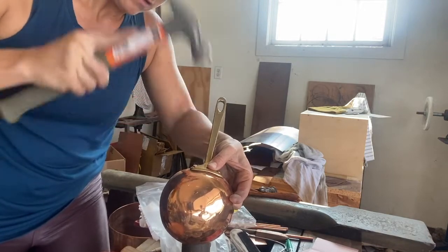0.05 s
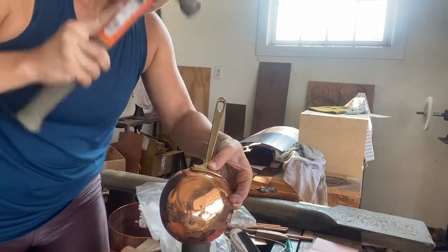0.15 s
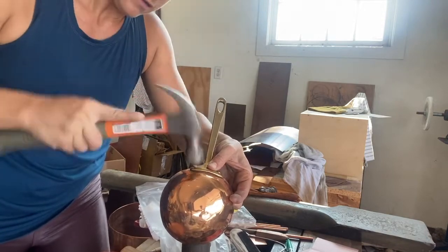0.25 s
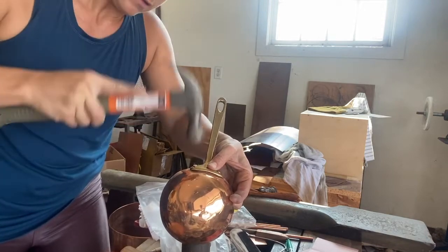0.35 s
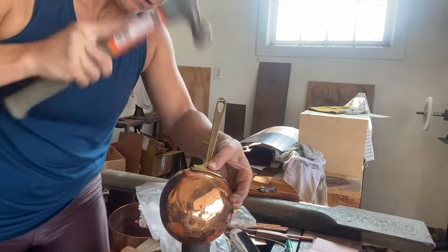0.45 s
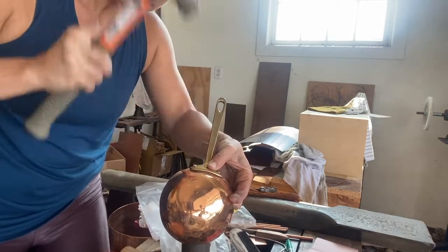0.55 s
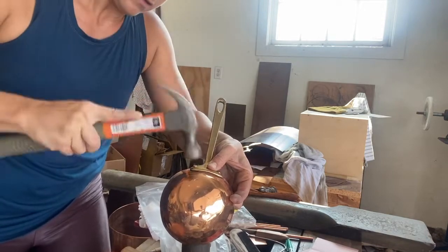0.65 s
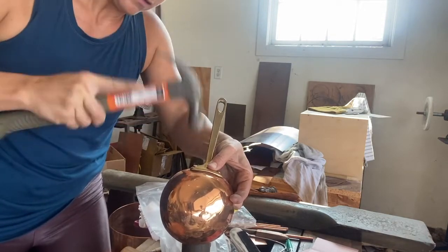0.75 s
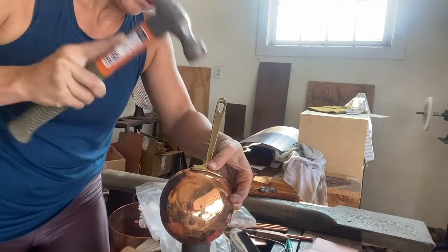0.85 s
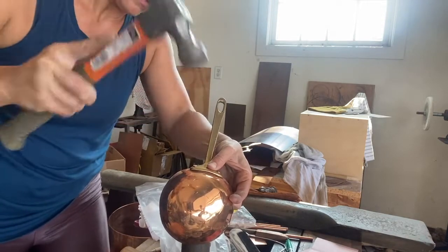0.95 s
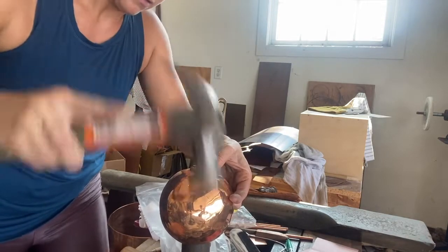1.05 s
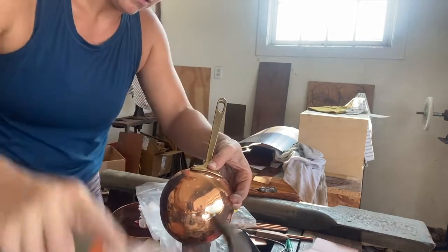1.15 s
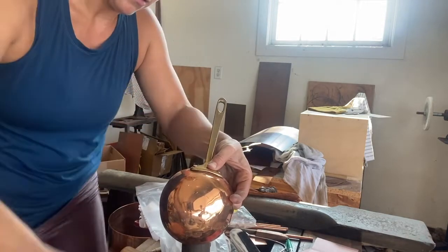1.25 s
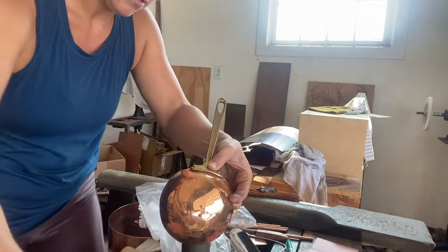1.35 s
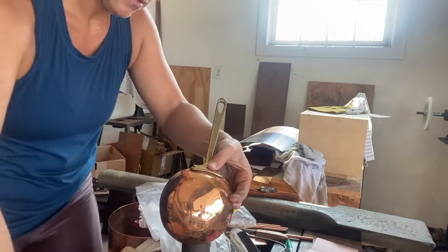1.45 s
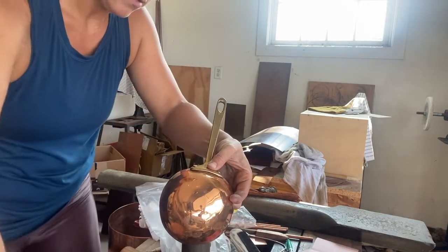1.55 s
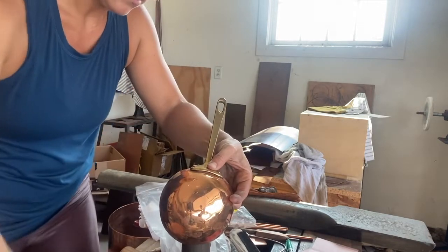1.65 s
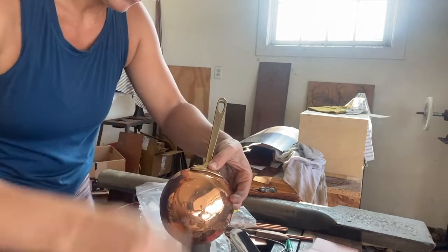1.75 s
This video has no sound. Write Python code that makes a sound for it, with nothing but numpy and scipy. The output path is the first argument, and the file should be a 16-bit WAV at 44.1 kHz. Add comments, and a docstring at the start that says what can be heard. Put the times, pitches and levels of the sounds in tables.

```python
"""In a workshop, a hammer drives a rivet in a copper bowl against a steel stake, close to the listener.
Each of two blows is chattering noise, damped steel tones and a low bench thump.
The loose bowl shakes, drops back and rattles: thousands of tiny random contacts, plus clear taps.
A decaying noise tail is the room's answer; shaped noise makes a steady low hum and faint rustles.
A faint bump, a slow bench sway and a thin late ring are single damped tones."""
import sys
import numpy as np
from scipy import signal
from scipy.fft import rfft, irfft, next_fast_len
from scipy.io import wavfile

SR = 44100
rng = np.random.default_rng(int(sys.argv[2]) if len(sys.argv) > 2 else 0)


def file_out(sig):
    """Save sig as 16-bit WAV at sys.argv[1]."""
    # one column per channel
    cols = np.atleast_2d(sig).T
    # limit, then scale
    lim = np.clip(cols, -1, 1)
    pcm = np.round(lim * 32767).astype(np.int16)
    wavfile.write(sys.argv[1], SR, pcm)


N = 79380
PRE = SR // 4  # lead-in samples, dropped at the end

# Moments of the hammer blows: [t/s]
BLOW_TIMES = [.2251, .61]
# One row per blow: [crack level/dB before a 3.5 dB cut, clack f/Hz, clack level/dB, squeal swell/s,
# steel level/dB, thud level/dB, boom level/dB, boom f/Hz, boom lag/s, knock level/dB, chatter length/s]
BLOWS = [(-11, 3400, -20.5, .001, -22.5, -25.5, -8, 80, .0095, -22.5, 0.0098),
         (-9, 3900, -16.5, .004, -16.5, -20, -14.5, 55, 0.015, -8, 0.0061)]


def blow(s, crack_db, clack_hz, clack_db, squeal_swell, steel_db, thud_db,
         boom_db, boom_hz, boom_lag, knock_db, chatter_s):
    """One impact sets off the contact noise, the steel and the bench together."""
    contact = crack(s, crack_db, squeal_swell, chatter_s) + clack(s, clack_hz, clack_db)
    bench = thud(s, thud_db, chatter_s) + boom(s, boom_db, boom_hz, boom_lag) + knock(s, knock_db)
    return contact + steel(s, steel_db) + bench


# Tone of the chattering contact: [f/Hz, relative level/dB per Hz]
CRACK_TONE = [(240, -22.5), (400, -10.5), (1000, -9.5), (2090, -17.5), (2800, -16), (3500, -12.5),
              (5110, -18.5), (7000, -15), (8200, -6), (9470, -7), (10500, -6), (11900, -13), (14600, -18.5),
              (16000, -23)]
CRACK_T60_S, AFTER_DB, AFTER_T60_S = 0.0051, -13, 0.21
REBOUND_S, REBOUND_DB = 0.0024, -11  # delay after the chatter, level of the second touch
SQUEAL_HZ, SQUEAL_WIDTH_HZ, SQUEAL_DB = 8180, 170, -6  # level against the noise


def crack(s, level_db, squeal_swell, chatter_s):
    """The hammer face chatters and sings, touches once more, and leaves a longer, weaker noise."""
    noise = coloured(rng.standard_normal(PRE + N), CRACK_TONE)
    squeal = amp(SQUEAL_DB) * band(SQUEAL_HZ, SQUEAL_WIDTH_HZ)
    squeal = squeal * np.minimum(since(s) / squeal_swell, 1)
    chatter = burst(s, .0004, chatter_s, CRACK_T60_S)
    rebound = amp(REBOUND_DB) * burst(s + chatter_s + REBOUND_S, 0.00038, 0.0024, CRACK_T60_S)
    after = amp(AFTER_DB) * noise * burst(s, 0.0014, chatter_s, AFTER_T60_S)
    return amp(level_db - 3.5) * ((noise + squeal) * (chatter + rebound) + after)


CLACK_WIDTH_HZ, CLACK_T60_S, CLACK_TONE_DB = 300, 0.022, 1.5  # tone level against the noise column


def clack(s, hz, level_db):
    """The first touch: a short noise band and a damped tone at the same pitch."""
    noise = amp(level_db) * band(hz, CLACK_WIDTH_HZ) * burst(s, .0008, 0.001, CLACK_T60_S)
    return noise + ring(hz, s, .0005, CLACK_T60_S, level_db + CLACK_TONE_DB)


# Ringing of the stake and hammer head: [f/Hz, relative level/dB, t60/s]
STEEL = [(660, -11, .05), (990, -10, 0.12), (1262, -12, 0.14), (1540, -9, .09), (2495, -13, .07),
         (3530, -12, .09), (6616, -15, 0.12), (7565, -16, .13), (7975, -6, .06), (8230, -6, 0.09),
         (8880, -10, .11), (12200, -14, 0.06)]


def steel(s, level_db):
    """Struck steel rings in many damped tones, a little different in pitch and level each time."""
    total = 0
    for hz, level, t60 in STEEL:
        varied_hz = hz * (1 + .002 * rng.normal())
        total = total + ring(varied_hz, s, .0006, t60, level_db + level + rng.normal(0, 2))
    return total


# Tone of the dull thud: [f/Hz, relative level/dB per Hz]
THUD_TONE = [(35, -41), (55, -6.5), (100, -4), (180, 1.5), (300, -1), (550, -2), (1500, -11.5),
             (3000, -38.5)]
THUD_LAG_S, THUD_RISE_S, THUD_T60_S = 0.00067, 0.0034, 0.1


def thud(s, level_db, chatter_s):
    """Mostly low noise that rises just after the touch and dies away."""
    noise = coloured(rng.standard_normal(PRE + N), THUD_TONE)
    return amp(level_db) * noise * burst(s + THUD_LAG_S, THUD_RISE_S, chatter_s, THUD_T60_S)


# How the bench boom grows and fades: [swell/s, t60/s]
BOOM_SHAPE = (0.0019, 0.059)
BOOM_SAG, BOOM_SAG_S = 0.54, 0.0022  # starts this share higher, sinks with this time constant


def boom(s, level_db, hz, lag):
    """The bench answers late with a deep tone that sinks in pitch."""
    return ring(hz, s + lag, *BOOM_SHAPE, level_db, BOOM_SAG, BOOM_SAG_S)


# Tones of the bench top: [f/Hz, relative level/dB, t60/s]
KNOCK = [(179, -8.5, 0.025), (241.8, 0, 0.034), (315, -2.5, 0.035), (554, -7, 0.021)]
KNOCK_LAG_S, KNOCK_SWELL_S = .0045, .0012


def knock(s, level_db):
    """The bench top sounds in several short damped tones."""
    return sum(ring(hz, s + KNOCK_LAG_S, KNOCK_SWELL_S, t60, level_db + level)
               for hz, level, t60 in KNOCK)


# The loose bowl shakes after every blow and drops back a moment later: [t/s, level/dB]
RATTLE_LEVEL = [(-.1, -55), (0, -37), (0.039, -39), (0.131, -45.5), (0.208, -54.5), (.24, -39.5),
                (0.349, -43), (0.418, -37), (0.499, -45), (0.591, -55.5), (.63, -36.5), (0.719, -41.5),
                (.8, -38.5), (0.872, -44.5), (.97, -60), (1.08, -72.5), (1.3, -96)]
# Tone of the bowl on the stake: [f/Hz, relative level/dB per Hz]
RATTLE_TONE = [(60, -30.5), (100, -15.5), (220, -9), (500, -11.5), (1200, -8), (1500, -8.5), (1800, -7),
               (2400, -9.5), (3400, -11), (4870, -17), (7940, -14.5), (10500, -17.5), (13200, -22),
               (15500, -24.5), (16200, -41.5)]
CONTACTS_PER_S, CONTACT_SCATTER_DB = 6300, 1
DULL_HZ, DULLING = 4000, 0.39  # treble above this loses so many extra dB per dB of level


def rattle():
    """Dense uneven contacts of the bowl on the stake; weaker shaking sounds duller."""
    scatter, strength = rng.standard_normal((2, PRE + N))
    touches = rng.random(PRE + N) < CONTACTS_PER_S / SR
    hits = touches * amp(CONTACT_SCATTER_DB * scatter) * strength
    s, db = np.transpose(RATTLE_LEVEL)
    level_db = np.interp((np.arange(PRE + N) - PRE) / SR, s, db)
    whole = coloured(hits, RATTLE_TONE)
    body = filtered(whole, lambda hz: 1 / (1 + (hz / DULL_HZ) ** 2))
    treble = (whole - body) * amp(DULLING * (level_db - db.max()))
    return amp(level_db) * (body + treble)


# Clear taps of the bowl: [t/s, level/dB before a 7 dB lift, f/Hz]
TAPS = [(0.021, -36, 1430), (0.033, -29, 1536), (0.0614, -42, 1580), (0.088, -34.5, 1466),
        (0.1247, -33.5, 1556), (0.16, -36.5, 1445), (0.3776, -34, 1006), (0.3825, -29, 1475),
        (0.409, -33.5, 1520), (0.417, -30.5, 1525), (0.428, -37.5, 1487), (0.433, -33, 1475),
        (0.445, -34.5, 1415), (0.4695, -33.5, 1535), (0.482, -37.5, 1394), (0.497, -36.5, 1551),
        (0.508, -37.5, 1490), (0.547, -43.5, 1471), (0.675, -35, 1044), (0.703, -32.5, 1419),
        (0.762, -30.5, 1460), (0.78, -36.5, 1502), (0.7994, -34, 1650), (0.818, -34, 1718),
        (0.8496, -38, 1462), (0.8728, -38.5, 1520)]


def taps():
    """Each clear tap is one short damped tone of the bowl."""
    return sum(ring(hz, s, 0.0023, 0.025, db + 7) for s, db, hz in TAPS)


# The bench sways after the last blow: [f/Hz, t/s, swell/s, t60/s, level/dB]
SWAY = (49, .68, .06, .7, -42)


def sway():
    """A deep damped tone of the bench, slow to grow."""
    return ring(*SWAY)


# A thin late ring: [f/Hz, t/s, swell/s, t60/s, level/dB]
WHINE = (4055, .62, .2, 1.7, -72)


def whine():
    """A high damped tone that swells slowly and lingers."""
    return ring(*WHINE)


# A faint low bump: [f/Hz, t/s, swell/s, t60/s, level/dB]
BUMP = (350, 1.607, .003, .035, -59)


def bump():
    """A single short damped tone."""
    return ring(*BUMP)


# Faint rustles: [t/s, level/dB, length/s]
RUSTLES = [(1.429, -79.5, 0.0069), (1.445, -82, 0.0077), (1.486, -85, 0.018), (1.553, -85, .003),
           (1.642, -94, 0.0032)]


def rustles():
    """Small bursts of noise with the same tone as the rattle."""
    noise = coloured(rng.standard_normal(PRE + N), RATTLE_TONE)
    return noise * sum(amp(db) * burst(s, .002, hold, 0.08) for s, db, hold in RUSTLES)


# Tone of the room hum: [f/Hz, relative level/dB per Hz]
HUM_TONE = [(15, -50.5), (25, -18.5), (40, -2), (60, -0.5), (110, -7.5), (150, -18.5), (190, -14.5),
            (326, -30.5), (543, -34), (900, -36.5), (1600, -51.5), (4150, -48.5), (7480, -56),
            (8320, -40.5), (10000, -61), (15000, -71)]
HUM_DB = -65.5  # before sharing out to left and right


def hum():
    """Low steady room tone, made of shaped noise."""
    return amp(HUM_DB) * paired(coloured(rng.standard_normal((2, N)), HUM_TONE))


# How long the room's answer lasts: [f/Hz, t60/s]
ROOM = [(100, 0.081), (400, 0.65), (1500, 0.3), (5000, 0.5), (12000, 0.33)]
SIDE_SMEAR_S = 0.0025  # t60
BLOW_WET_DB, RATTLE_WET_DB, SMALL_WET_DB = -19.5, -8, -4  # room tail against the direct sound


def placed(x, wet_db):
    """Direct sound, scattered a little on its way to the side pickup, and a room tail."""
    hz, t, z = signal.stft(rng.standard_normal((2, SR * 3 // 4)), SR, nperseg=256)
    fade = amp(-60 * t / along(ROOM, hz)[:, None])
    tail = signal.istft(z * fade, SR, nperseg=256)[1]
    tail = amp(wet_db) * tail / np.linalg.norm(tail[0])
    answer = np.pad(tail, ((0, 0), (300, 0)))  # the tail starts 300 samples late
    smear = rng.standard_normal(200) * amp(-60 * np.arange(200) / SR / SIDE_SMEAR_S)
    answer[0, 0] = 1
    answer[1, :200] = (np.arange(200) == 0) * 0.93 + 0.26 * smear / np.linalg.norm(smear)
    return paired(signal.fftconvolve(x[None], answer, axes=1)[:, :PRE + N])


# Width of the microphone pair: [f/Hz, side over mid level/dB]
WIDTH = [(45, -5.5), (100, -10.5), (300, -5), (800, -5.5), (1500, -3.5), (2300, -3), (4000, -0.5),
         (5500, 0.5), (6900, -4.5), (7300, -25), (8400, -20), (8900, -4), (9700, 6.5), (10100, 31),
         (11200, 23), (11700, 1.5), (12300, -23.5), (13700, -27), (14200, 2), (14800, 23), (16000, 23)]
LEAN_DB = -0.86  # left over right


def paired(pair):
    """Left and right from two versions of a sound, shared out to mid and side by frequency."""
    def shares(hz):
        angle = np.arctan(amp(along(WIDTH, hz)))
        return np.array([np.cos(angle), 1j * np.sin(angle)])  # 1j: quarter-turn of phase
    mid, side = filtered(pair, shares)
    return np.array([mid + side, mid - side]) * amp([[LEAN_DB / 2], [-LEAN_DB / 2]])


def ring(hz, s, swell, t60, db, sag=0, sag_s=1):
    """One damped tone with a soft start; its pitch may sink."""
    t = since(s)
    level = amp(db - 60 * t / t60) * (1 - np.exp(-t / swell))
    bent_time = t + sag * sag_s * (1 - np.exp(-t / sag_s))
    return level * np.sin(2 * np.pi * hz * bent_time)


def burst(s, rise, hold, t60):
    """Loudness curve: rise, hold, decay."""
    t = since(s)
    return np.minimum(t / rise, 1) * amp(-60 * np.maximum(t - rise - hold, 0) / t60)


def band(centre_hz, width_hz):
    """Noise in one resonance, at half amplitude width_hz either side of its centre."""
    noise = rng.standard_normal(PRE + N)
    return unit(filtered(noise, lambda hz: 1 / (1 + ((hz - centre_hz) / width_hz) ** 2)))


def coloured(x, spectrum):
    """Shape x to a tone table, at average (RMS) level 1."""
    return unit(filtered(x, lambda hz: amp(along(spectrum, hz))))


def filtered(x, response):
    """Multiply each frequency of x by the response."""
    m = next_fast_len(x.shape[-1] + 8192)
    return irfft(rfft(x, m) * response(np.fft.rfftfreq(m, 1 / SR)), m)[..., :x.shape[-1]]


def along(points, hz):
    """Read between (f/Hz, value) points on a log frequency axis."""
    f, v = np.transpose(points)
    return np.interp(np.log(hz + 1), np.log(f + 1), v)


def since(s):
    """Seconds after moment s, zero before."""
    return np.maximum((np.arange(PRE + N) - PRE) / SR - s, 0)


def unit(x):
    """Scale x to average (RMS) level 1."""
    return x / np.sqrt(np.mean(x ** 2) + 1e-20)


def amp(db):
    """Turn decibels into an amplitude factor."""
    return 10 ** (np.asarray(db) / 20)


def scene():
    """Blows, rattle and small sounds in the room; the thin ring and hum are added without it."""
    out = sum(placed(blow(s, *row), BLOW_WET_DB) for s, row in zip(BLOW_TIMES, BLOWS))
    out = out + placed(rattle(), RATTLE_WET_DB)
    small = taps() + sway() + bump() + rustles()
    out = out + placed(small, SMALL_WET_DB) + whine()
    return out[:, PRE:] + hum()


CLIP_TOP = 1  # amplitude around which peaks are rounded
BOTTOM_HZ, TOP_HZ = 37.7, 16200


def record(dry):
    """Peaks are rounded off; the microphone loses the deepest bass; nothing above the band limit."""
    rounded = dry / (1 + np.abs(dry / CLIP_TOP) ** 4) ** 0.27
    return filtered(rounded, lambda hz: (hz < TOP_HZ) / np.sqrt(1 + (BOTTOM_HZ / (hz + 1)) ** 4))


dry = scene()
out = record(dry)
file_out(out)
```